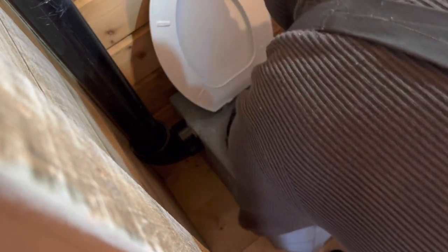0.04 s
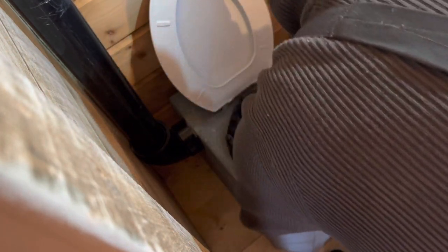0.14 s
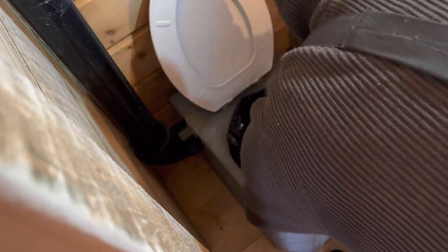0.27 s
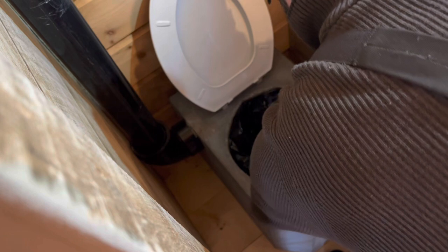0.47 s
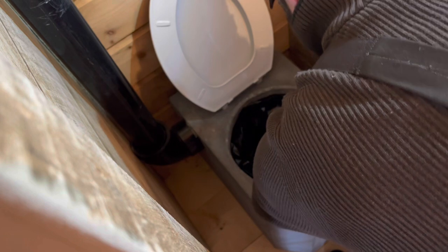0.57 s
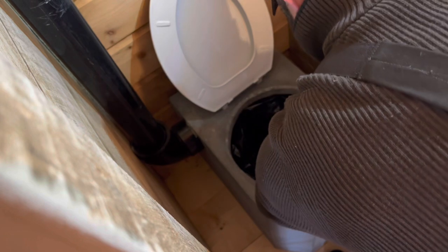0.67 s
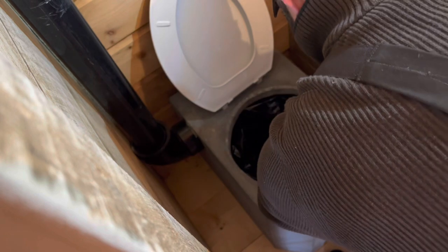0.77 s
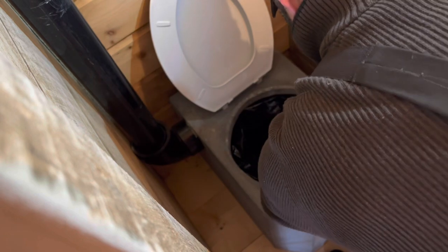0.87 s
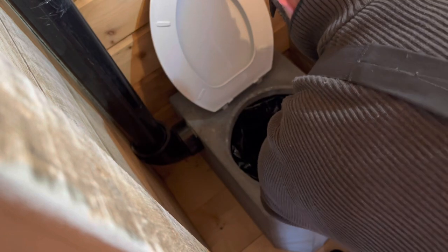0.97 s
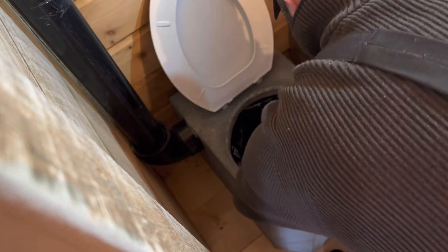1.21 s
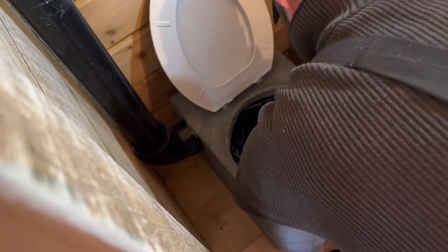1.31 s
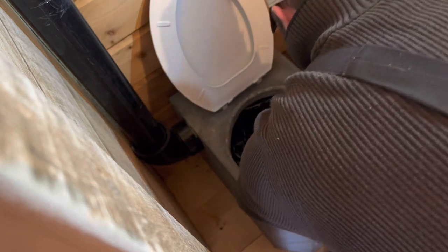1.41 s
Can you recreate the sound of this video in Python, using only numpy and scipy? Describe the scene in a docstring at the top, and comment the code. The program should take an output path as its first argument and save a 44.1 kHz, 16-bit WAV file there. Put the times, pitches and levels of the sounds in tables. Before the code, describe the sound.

A plastic pail lined with a heavy bag is pushed into a hollow base in a small wooden room. From 0 to 0.4 s, dull low bumps and soft rustle; at 0.45 to 0.75 s, a loud, fast judder of hollow rim knocks, rubbing and deep booms, strongest around 0.5 and 0.58; then weak thuds and bag crinkles, near quiet by 1.15, faint taps at 1.33 and 1.4.

```python
"""Lined pail into a hollow base

Small wooden room, stereo microphone, the sources well above their room sound and a quiet room tone.
A plastic pail lined with a heavy bag is pushed into a hollow base. Its rim knocks and judders against
the opening (ringing pail modes and noise cracks), the base booms at each shove (swelling low modes),
and bag and clothing rustle throughout (coloured noise, grains, rubbing through the wall, bright snaps)."""
import sys
import numpy as np
from scipy import signal
from scipy.fft import rfft, irfft
from scipy.io import wavfile

SR = 44100
rng = np.random.default_rng(int(sys.argv[2]) if len(sys.argv) > 2 else 0)


def amplitude_ratio(level_db):
    """Convert a level in decibels to the matching linear amplitude (field) ratio."""
    exponent = np.asarray(level_db, float) / 20
    return 10 ** exponent


def pcm_store(signal):
    """Save signal as 16-bit PCM."""
    levels = np.round(np.clip(np.atleast_2d(signal), -1, 1) * 32767)
    wavfile.write(sys.argv[1], SR, levels.astype(np.int16).T)


N = 63945  # samples


def evened(x):
    """Scales to rms 1."""
    return x / np.sqrt(np.mean(x ** 2) + 1e-20)


def read(points, hz):
    """Reads a table on a log-frequency axis."""
    f, value = np.transpose(points)
    return np.interp(np.log(hz + 1), np.log(f + 1), value)


def add(mix, s, sound):
    """Mixes a stereo sound in at time s."""
    part = mix[:, round(s * SR):][:, :sound.shape[1]]
    part += sound[:, :part.shape[1]]


def sides(db):
    """Left and right gains for a left-minus-right level."""
    return amplitude_ratio(np.array([db / 2, -db / 2]))


# left-right likeness of the noise sounds: f/Hz, likeness (held within -1..1); above 8 kHz the bands turn nearly
# in phase or opposed
LIKENESS = [(150, 0.95), (300, .9), (600, 0.38), (2000, 0.19), (5000, -0.0018), (8000, 0.52), (8900, -0.96),
            (10200, -1.087), (10800, 0.9), (12700, 1), (13400, -.99)]
# stereo balance at the microphone: f/Hz, left minus right/dB
BALANCE = [(60, -1.5), (180, 2.5), (550, -8), (1650, 1.5), (4970, -7.5), (8700, -1), (15000, 0.5)]


def pair(a, b, colour):
    """Colours two unrelated signals, mixes them to the left-right likeness and scales to rms 1."""
    hz = np.fft.rfftfreq(len(a), 1 / SR)
    za, zb = rfft(a), rfft(b)
    same = np.clip(read(LIKENESS, hz), -1, 1)
    stereo = np.array([za, same * za + np.sqrt(1 - same ** 2) * zb])
    stereo = stereo * amplitude_ratio(read(colour, hz)) * sides(read(BALANCE, hz))
    return evened(irfft(stereo, len(a)))


# spectrum of the room tone: f/Hz, relative level/dB per Hz
FLOOR_COLOUR = [(20, -24), (97, 4), (151, -2), (194, -38), (9370, -67.5), (15000, -94.5)]


def floor():
    """Quiet room tone: steady coloured noise."""
    level_db = -50
    return amplitude_ratio(level_db) * pair(*rng.standard_normal((2, N)), FLOOR_COLOUR)


# bag rustle: t/s, treble level/dB, level of rubbing through the pail wall/dB
RUSTLE_LEVELS = [(0.0, -44.5, -48), (0.06, -52, -49), (0.112, -49.5, -37.5), (0.184, -54, -48),
                 (0.226, -53, -43.5), (0.39, -59.5, -52.5), (0.428, -55.5, -67.5), (0.448, -47, -38),
                 (0.484, -41, -30.5), (0.496, -42.5, -35.5), (0.568, -41.5, -28), (0.678, -59, -34),
                 (0.71, -59.5, -27.5), (0.786, -74, -42.5), (0.868, -52, -51.5), (1.0, -57.5, -52.5),
                 (1.158, -79, -74.5), (1.23, -59, -58.5), (1.32, -62, -61), (1.336, -49.5, -52.5),
                 (1.368, -56, -63), (1.408, -48, -54.5), (1.45, -53.5, -68)]
# spectrum of rustle and snaps: f/Hz, relative level/dB per Hz
BAG_COLOUR = [(120, -38.5), (200, -3), (263, 1), (316, -7), (1460, -9.5), (7860, -16.5), (11700, -22),
              (14400, -24.5), (15700, -27.5)]
# pail modes, for rubbing and knocks: f/Hz
PAIL_MODES_HZ = [220, 255, 327, 358, 490, 545, 612, 638, 735, 820, 888, 1028, 1093, 1165, 1258, 1335, 1515,
                 1640, 1800, 2040]
# the same modes: level/dB, t60/s before any grip, left leads/rad, left minus right/dB
PAIL_MODES = [(-8.5, 0.94, 1.5, -2.5), (-1, .6, -.1, -2), (0, 0.065, 1.87, 2.5), (-5, 0.2, -0.4, -6.5),
              (-3, 0.26, 4, -0.5), (-7, .3, .7, -8), (0.5, 0.1, 1.8, -7.5), (-4, 0.19, 2, -11.5),
              (-9.5, 0.22, 2, -5), (-7.5, 0.18, 1.5, -11.5), (-3, 0.18, 1.43, 1), (-0.5, 0.044, 5, 7),
              (0.5, 0.073, -1, -6.5), (-2.5, 0.16, -1.9, 3), (-2, 0.23, 3.5, 1.5), (-4, 0.18, -2, -8),
              (-4.5, 0.066, 1.4, -5.5), (-4, 0.2, -1.5, -4), (-6, 0.059, 0, -2.5), (-6.5, 0.077, 1.5, -3)]


def rustle():
    """Hiss and fine crackle of the bag; rubbing noise also shakes the pail modes."""
    grains_per_s, spread_db, grain_db = 3200, 2.5, -0.5
    rub_hz, rub_octaves = 550, 0.64
    s, treble_db, rub_db = np.transpose(RUSTLE_LEVELS)
    t = np.arange(N) / SR

    struck = rng.random((2, N)) < grains_per_s / SR
    size = amplitude_ratio(spread_db * np.minimum(rng.exponential(1, (2, N)), 4))
    grains = struck * size * rng.choice([-1, 1], (2, N))
    drive = rng.standard_normal((2, N)) + amplitude_ratio(grain_db) * evened(grains)
    hiss = pair(*drive, BAG_COLOUR)
    # the treble level refers to this band of the left-right mean
    treble = signal.butter(4, [3000, 8500], "band", fs=SR, output="sos")
    hiss /= np.std(signal.sosfilt(treble, hiss.mean(0)))

    wall_t = np.arange(SR // 4) / SR
    wall = np.zeros(len(wall_t))
    for hz, (db, t60, _, _) in zip(PAIL_MODES_HZ, PAIL_MODES):
        reach = np.exp(-.5 * (np.log2(hz / rub_hz) / rub_octaves) ** 2)
        # rubbed modes die twice as fast as knocked ones
        wall += reach * amplitude_ratio(db - 120 * wall_t / t60) * np.sin(2 * np.pi * hz * wall_t)
    rub = evened(signal.oaconvolve(rng.standard_normal((2, N)), wall[None], axes=1)[:, :N])
    rub = rub + 0.23 * rub[::-1]  # each side leaks into the other
    return hiss * amplitude_ratio(np.interp(t, s, treble_db)) + rub * amplitude_ratio(np.interp(t, s, rub_db))


# shoves on the base: t/s, level/dB, upper-lower tilt/dB, extra damping by the grip/(dB/s), below 0 as 0
SHOVES_ON_BASE = [(.025, -21.5, -1, 60), (.075, -20, -1.5, 35), (.112, -16.5, 3, 97), (0.152, -31, 13, 158),
                  (.21, -15.5, -1, 57), (0.236, -19.5, 10, 85), (0.301, -22, 2.5, 51),
                  (0.334, -17.5, 0, 53), (.365, -28, -10, 79), (0.449, -10.5, 4, 12.5),
                  (0.495, -13.5, 29.5, 141), (0.524, -0.5, 5, 76), (0.56, -4.5, -1, 126.5),
                  (0.625, -2.5, 5, 227.5), (0.702, -5.5, 11, 283), (.745, -26, -6.5, 32),
                  (0.778, -27, 19, 67), (.834, -28.5, 12.5, 8.5), (0.883, -25, 9, -8.5),
                  (0.929, -22.5, 5.5, 71), (1.009, -33.5, -1.5, 31), (1.097, -36.5, 2, 14),
                  (1.362, -42, 8.5, 14), (1.398, -41.5, 17, 7)]
# modes of the hollow base: f/Hz
BASE_MODES_HZ = [41, 74, 95, 125, 140, 164, 255]
# the same modes: level/dB, t60/s before the grip, share of the upper-lower tilt
BASE_MODES = [(-5, 1.7, .2), (2.5, 0.51, -0.54), (-1, 0.32, -1.1), (1, 0.28, 0.54), (-1, 0.17, 0.27),
              (-23, 0.061, 0.99), (-16.5, 0.35, .6)]


def base():
    """Each shove swells into the low modes of the hollow base."""
    rise_s, left_minus_right_db, right_lag_rad = 0.018, -1.44, 0.078
    out = np.zeros((2, N))
    t = np.arange(SR) / SR
    hz = np.array(BASE_MODES_HZ)[:, None]
    db, t60, share = (column[:, None] for column in np.transpose(BASE_MODES))
    turn = 2 * np.pi * hz * t
    waves = np.array([np.sin(turn), np.sin(turn - right_lag_rad)])
    rings = amplitude_ratio(db - 60 * t / t60) * waves * (1 - np.exp(-t / rise_s))
    for s, level_db, tilt_db, grip in SHOVES_ON_BASE:
        boom = (amplitude_ratio(tilt_db * share) * rings).sum(1)
        boom = sides(left_minus_right_db)[:, None] * boom
        add(out, s, amplitude_ratio(level_db - max(grip, 0) * t) * boom)
    return out


# rim knocks: t/s, level/dB, centre of the modes reached f/Hz, reach/octaves, extra damping by the grip/(dB/s)
RIM_KNOCKS = [(0.099, -25.5, 310, 2.5, 189), (0.124, -27.5, 605, 0.91, 202), (0.318, -33, 600, 0.53, 38),
              (.443, -17.5, 1480, 0.6, 152), (.464, -16, 585, 0.36, 54), (0.474, -21, 2040, 0.15, 199),
              (0.4898, 3, 1100, 0.36, 399.5), (0.502, 4, 800, 0.68, 418.5), (0.525, -1.5, 1100, 0.4, 452),
              (.543, -5, 606, 1.1, 199.5), (0.556, -9.5, 1620, 0.33, 92.5), (.5765, 4, 780, 0.54, 400.5),
              (.592, 0.5, 488, 0.34, 127), (.6, -7, 358, 0.19, 98.5), (.612, -6.5, 430, 1.1, 140),
              (.632, -12, 590, 0.19, 395), (.692, -14, 1120, 0.42, 61.5), (.703, -7.5, 342, 0.62, 125),
              (0.73, -21, 720, 1.9, 302), (.752, -20, 532, 0.12, 61), (1.332, -48, 590, 0.46, 58),
              (1.399, -42, 1075, 1.3, 53)]
# spectrum of a knock's broad burst: f/Hz, relative level/dB per Hz
CRACK_COLOUR = [(88, -45), (150, -9.5), (388, -20), (618, -17), (1600, -20), (8330, -53.5), (12000, -65.5),
                (15500, -86)]


def knocks():
    """Each knock rings the pail modes near its centre and gives a short broad crack."""
    ring_rise_s, crack_rise_s, crack_t60_s = 0.0015, 0.00067, .08
    crack_db, crack_db_per_octave = -20, 6  # for a knock centred on 800 Hz; slope with its centre
    out = np.zeros((2, N))
    t = np.arange(SR // 2) / SR
    hz = np.array(PAIL_MODES_HZ)[:, None]
    db, t60, lead, pan = (column[:, None] for column in np.transpose(PAIL_MODES))
    phase = np.array([np.maximum(lead, 0), np.maximum(-lead, 0)])
    waves = np.sin(2 * np.pi * hz * t + phase)
    rings = amplitude_ratio(db - 60 * t / t60) * sides(pan) * waves * np.minimum(t / ring_rise_s, 1)
    for s, level_db, centre_hz, octaves, grip in RIM_KNOCKS:
        reach = np.exp(-.5 * (np.log2(hz / centre_hz) / octaves) ** 2)
        ring = (reach * rings).sum(1) / np.linalg.norm(reach * amplitude_ratio(db)) / 2
        ring = amplitude_ratio(-max(grip, 0) * t) * ring
        burst_db = crack_db + crack_db_per_octave * np.log2(centre_hz / 800)
        crack = pair(*rng.standard_normal((2, len(t))), CRACK_COLOUR)
        crack = crack * amplitude_ratio(burst_db - 60 * t / crack_t60_s) * np.minimum(t / crack_rise_s, 1)
        add(out, s, amplitude_ratio(level_db) * (ring + crack))
    return out


# decay of the small wooden room: f/Hz, t60/s
ROOM_DECAY = [(100, 0.21), (500, 0.33), (2000, 0.053), (8000, 0.052)]


def room(x):
    """Sparse reflections of random sign, each band dying at its own speed."""
    level_db = -14
    taps = np.zeros((2, SR // 2))
    slots = np.arange(120, SR // 2 - 20, 20)
    at = slots + rng.integers(0, 20, (2, len(slots)))  # one reflection in every 20 samples
    np.put_along_axis(taps, at, rng.choice([-1., 1.], at.shape), 1)
    hz, t, z = signal.stft(taps, SR, nperseg=256)
    decay = amplitude_ratio(-60 * t / read(ROOM_DECAY, hz)[:, None])
    tail = signal.istft(z * decay, SR, nperseg=256)[1]
    tail = pair(*tail[:, :SR // 2], [(100, 0), (200, 0)])  # flat colour
    tail = tail / np.linalg.norm(tail[0])
    return amplitude_ratio(level_db) * signal.fftconvolve(x.mean(0)[None], tail, axes=1)[:, :N]


# creases of the bag snapping: t/s, level/dB, t60/s
CREASE_SNAPS = [(0.296, -42, .04), (.82, -53, .1), (0.928, -44, .05), (1.005, -50, 0.055),
                (1.192, -51.5, 0.087), (1.3322, -45, .07)]


def snaps():
    """A crease gives way: a sudden bright burst, the colour of the rustle with its treble lifted."""
    out = np.zeros((2, N))
    t = np.arange(SR // 5) / SR
    for s, level_db, t60 in CREASE_SNAPS:
        bright = signal.lfilter([1, -.9], 1, rng.standard_normal((2, len(t))))
        add(out, s, amplitude_ratio(level_db - 60 * t / t60) * pair(*bright, BAG_COLOUR))
    return out


def scene():
    """All sources; the knocks ring in the small room."""
    hits = knocks()
    return floor() + rustle() + base() + hits + room(hits) + snaps()


def low_pass(x):
    """Removes everything above the highest recorded frequency."""
    return signal.sosfilt(signal.butter(12, 15880, fs=SR, output="sos"), x)


def record(dry):
    """Microphone stage: a low cut at 71 Hz, then a soft limit that rounds off the loudest peaks."""
    low_cut = signal.butter(6, 71, "high", fs=SR, output="sos")
    cut = signal.sosfilt(low_cut, dry)
    limited = 1.16 * np.tanh(cut / 0.95)
    return low_pass(limited)


dry = scene()
out = record(dry)
pcm_store(out)
```